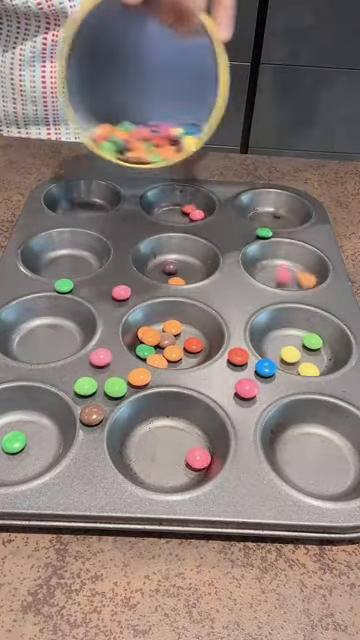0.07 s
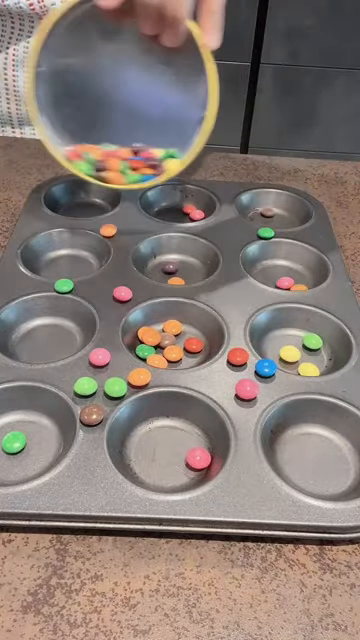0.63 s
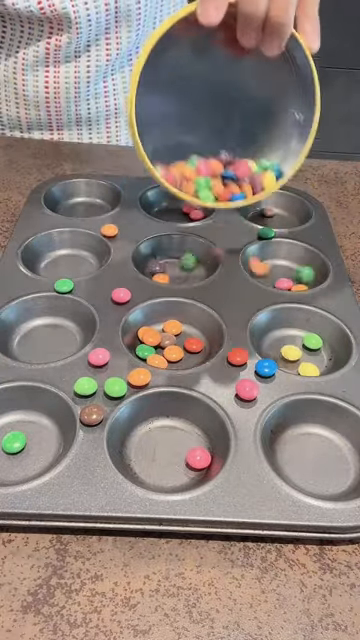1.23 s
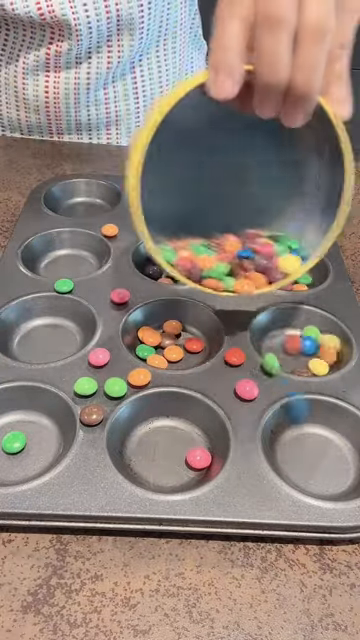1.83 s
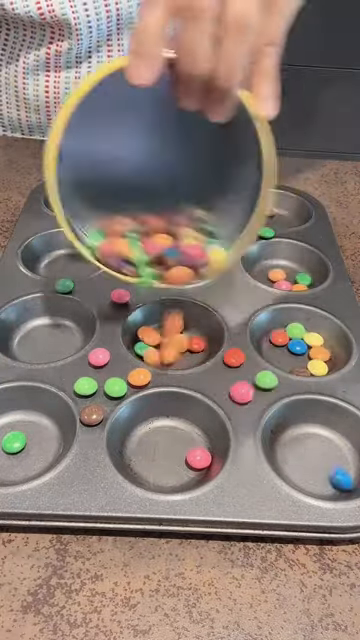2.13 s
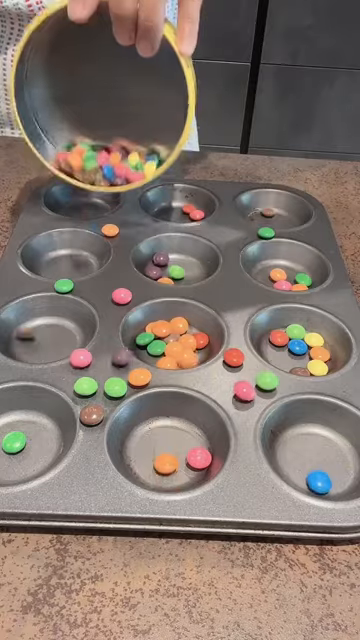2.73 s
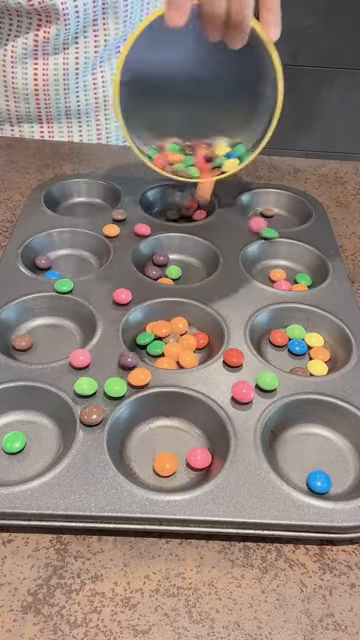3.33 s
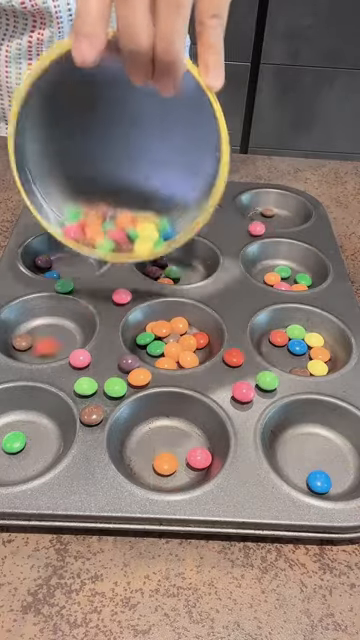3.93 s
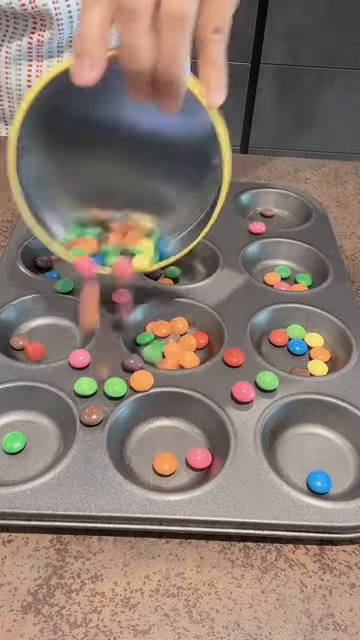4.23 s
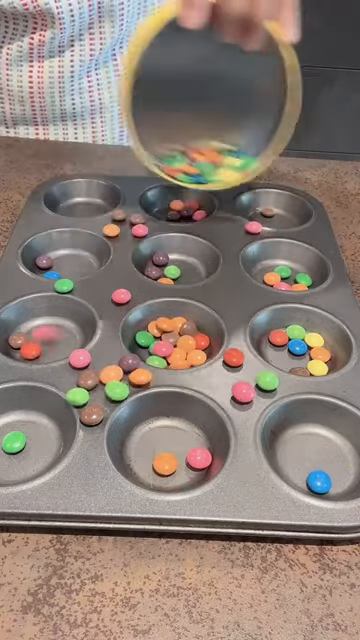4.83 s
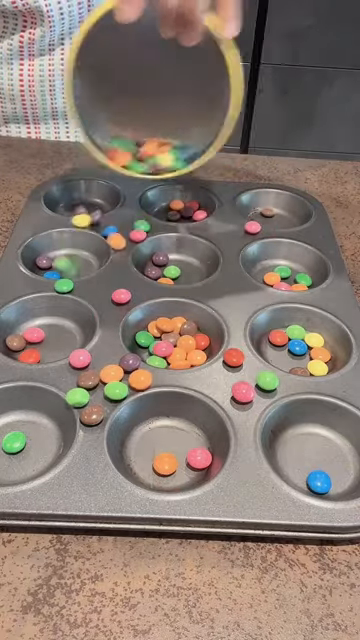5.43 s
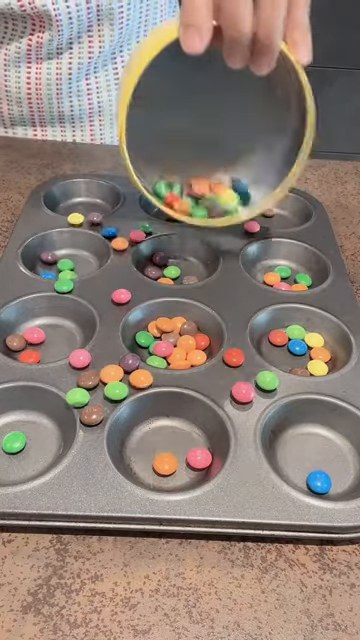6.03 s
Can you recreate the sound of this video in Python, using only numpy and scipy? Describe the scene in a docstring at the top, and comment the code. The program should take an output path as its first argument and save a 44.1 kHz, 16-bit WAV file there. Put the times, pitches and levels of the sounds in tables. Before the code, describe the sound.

Hard candies slide and rattle in a round tin as it is shaken again and again. A few at a time they drop onto a steel cupcake tray, each landing with a sharp crack, a bright metallic ring and often some quick, weaker bounces. The clatter thins late on, flares up once more and ends on a light hit. It is heard up close in a small, quiet kitchen with hard surfaces.

```python
"""Over the hush of a small, hard kitchen, a sugar-shelled candy cracks onto a steel cupcake tray,
rings a cup floor and hops on in shorter, weaker bounces. Shake after shake, the heap slides in a round
tin and more candies drop, ringing the deck, cup floors and cup walls and stirring those lying about.
From 0.7 s on, an odd one hits the tin's wall and leaves it humming, or makes one tray mode sing alone.
The clatter thins after 4.5 s, flares up just past 5 s and ends with a last light hit at 6 s."""
import sys
import numpy as np
from scipy import signal
from scipy.fft import rfft, irfft
from scipy.io import wavfile

SR = 44100
rng = np.random.default_rng(int(sys.argv[2]) if len(sys.argv) > 2 else 0)


def wav_out(sig):
    """Save sig, one row per channel (or a flat mono array), as 16-bit PCM at SR to the path in sys.argv[1]."""
    wavfile.write(sys.argv[1], SR, np.round(np.clip(np.atleast_2d(sig).T, -1, 1) * 32767).astype(np.int16))


N = 267687
CUTOFF_HZ = 15900


def from_db(db):
    """Decibels to gain."""
    return 10 ** (np.asarray(db) / 20)


def rms_one(x):
    """Scale to rms 1."""
    return x / np.sqrt(np.mean(x ** 2) + 1e-20)


def fade(t, t60):
    """Exponential decay, 60 dB down after t60."""
    return np.exp(-np.log(1000) * t / t60)


def at_hz(points, hz):
    """Read a curve on a log-frequency axis."""
    known_hz, values = np.transpose(points)
    return np.interp(np.log(np.maximum(hz, 1)), np.log(known_hz), values)


def add(out, s, sound):
    """Mix a sound in, starting at s seconds."""
    start = int(np.clip(round(s * SR), 0, N - 1))
    out[start:start + len(sound)] += sound[:N - start]


def coloured(x, curve, size=2048):
    """Minimum-phase EQ; white noise keeps its power."""
    gain = rms_one(from_db(at_hz(curve, np.linspace(0, SR / 2, size // 2 + 1))))
    cepstrum = irfft(np.log(gain))[:size // 2]
    cepstrum[1:] *= 2
    impulse = irfft(np.exp(rfft(cepstrum, size)))
    return signal.oaconvolve(x, impulse)[:N]


def ring(clicks, hz, t60):
    """A unit click sets a sine of height 1 ringing."""
    r, w = fade(1 / SR, t60), 2 * np.pi * hz / SR
    return signal.lfilter([0, np.sin(w)], [1, -2 * r * np.cos(w), r * r], clicks + 1e-18)


def resonance(x, hz, width_hz):
    """Band-pass with unity gain at its peak."""
    r, w = np.exp(-np.pi * width_hz / SR), 2 * np.pi * hz / SR
    return signal.lfilter(np.array([1, 0, -1]) * (1 - r * r) / 2, [1, -2 * r * np.cos(w), r * r], x)


def sines(hz, t):
    """A bank of sines, one row per pitch."""
    return np.sin((2 * np.pi * np.outer(hz, t)).astype(np.float32))


def clicks_at(times, heights):
    """One click at each time."""
    out = np.zeros(N)
    np.add.at(out, np.clip(np.round(times * SR).astype(int), 0, N - 1), heights)
    return out


def grains(per_s, spread_db):
    """Random tiny collisions at rms 1; with spread, a few stand out from many weak ones."""
    sizes = from_db(spread_db * np.minimum(rng.exponential(1, N), 4)) * rng.choice([-1, 1], N)
    return rms_one(sizes * (rng.random(N) < per_s / SR))


# EQ of the room tone: (frequency [Hz], level [dB])
ROOM_TONE_EQ = [(25, -11), (80, 0.5), (250, 5.5), (700, -6), (2000, -1), (6000, 10.5), (15000, -47)]

def room_tone(level_db):
    """The kitchen's hush, a steady noise bed under everything."""
    return from_db(level_db) * coloured(rng.standard_normal(N), ROOM_TONE_EQ)


# the mix at each landing place, with deck, floor and wall relative to the ring level:
# place: (deck [dB], deck tilt [dB/octave], cup floor [dB], cup wall [dB], bounce loss [dB], thump [dB])
PLACE_MIX = {"middle": (-6, -7.5, -9, -5, 9, -45), "deck": (-0.5, -1, -11.5, -26, 7.5, -44.5),
             "edge": (-1, 4, 1, -5, 5, -40), "cup lip": (0, -0.5, 0.5, -4, 6.5, -41),
             "cup floor": (-16.5, -3.5, 4, -34, 5, -45.5), "cup wall": (-11, 5, -27, -1, 15, -41.5),
             "tin wall": (-3.5, 10.5, -8, -10, 0, -48)}
# cue list of falling candies: (time [s], ring [dB], crack [dB], first hop [s] or 0 for none, place)
LANDINGS = [(0.002, -12.5, -16, 0.049, "cup floor"), (0.2542, -4.5, -10.5, 0.0099, "middle"),
            (0.3212, -11.5, -21.5, 0.01, "deck"), (0.6994, -28.5, -32, 0.00041, "tin wall"),
            (0.854, -17.5, -15, 0, "cup lip"), (0.877, -13.5, -12.5, 0.018, "cup lip"),
            (0.9427, -17, -15, 0.0046, "cup wall"), (0.9991, -4.5, -22, 0.003, "deck"),
            (1.0111, -6, -19, 0.042, "deck"), (1.1131, -16.5, -28, 0.014, "cup lip"),
            (1.193, -9.5, -16, 0.079, "cup floor"), (1.196, -12.5, -12.5, 0.0016, "cup lip"),
            (1.3084, -12, -19, .024, "cup floor"), (1.509, -13, -20, 0.048, "cup wall"),
            (1.6117, -4, -13, 0, "cup wall"), (1.631, -12, -7.5, 0.0035, "middle"),
            (1.6751, -8.5, -19, 0.056, "cup floor"), (1.705, -16.5, -13, 0.0043, "deck"),
            (1.8878, -26, -21.5, 0.0044, "cup floor"), (1.9283, -45, -21, 0.0048, "edge"),
            (2.0, -17, -16.5, 0.00052, "edge"), (2.0185, -12.5, -27, 0.0074, "cup floor"),
            (2.0676, -11.5, -20, 0.00044, "cup floor"), (2.108, -5, -17, 0.00079, "cup wall"),
            (2.1222, -8, -21, 0, "cup wall"), (2.1576, -17, -16, .02, "edge"),
            (2.2357, -11, -15, 0.0017, "cup floor"), (2.25, -9.5, -15.5, 0.0024, "cup wall"),
            (2.295, -15, -15, 0.0011, "cup lip"), (2.3223, -21, -15.5, 0.0024, "edge"),
            (2.3442, -9, -9.5, 0.0032, "cup wall"), (2.3601, -11, -17.5, 0.0022, "deck"),
            (2.4202, -35, -17, 0.0052, "edge"), (2.4559, -12, -17, .057, "cup floor"),
            (2.666, -7, -22, 0.0036, "cup floor"), (2.7431, -14.5, -22, 0.032, "cup floor"),
            (2.8388, -7, -10, 0.00023, "cup lip"), (2.8464, -18, -9, 0.022, "deck"),
            (2.9025, -15, -21, 0.0026, "deck"), (2.9077, -7.5, -15, 0.0018, "deck"),
            (3.004, -6, -11.5, 0.01, "deck"), (3.0346, -17, -12.5, 0.0018, "cup wall"),
            (3.1062, -13, -20, 0.0031, "deck"), (3.131, -15, -18, 0.00096, "cup floor"),
            (3.1772, -8, -10.5, .042, "deck"), (3.323, -15, -13, 0, "cup lip"),
            (3.4132, -19.5, -12.5, 0.00093, "deck"), (3.4996, -6, -8.5, 0.0021, "deck"),
            (3.5599, -12.5, -13.5, 0, "deck"), (3.6092, -4.5, -13.5, 0.047, "cup wall"),
            (3.857, -42, -19, 0.0045, "cup floor"), (3.945, -21, -29, 0, "tin wall"),
            (4.0683, -8, -11.5, 0.00062, "cup wall"), (4.0889, -5.5, -14, 0.002, "cup wall"),
            (4.1514, -10, -16.5, 0.045, "deck"), (4.2365, -29, -21, 0, "edge"),
            (4.242, -14.5, -7, 0, "deck"), (4.2797, -8, -8, .03, "cup lip"),
            (4.3522, -14, -27, 0.06, "edge"), (4.466, -42, -22.5, 0.0097, "deck"),
            (4.8212, -20, -36, 0.0072, "cup floor"), (4.9728, -39, -28, 0, "tin wall"),
            (4.996, -22.5, -27, 0.00056, "tin wall"), (5.094, -3, -9.5, 0.0013, "middle"),
            (5.114, -6, -10.5, 0.043, "middle"), (5.2755, -8, -10.5, 0.00079, "deck"),
            (5.3011, -5, -14, 0.025, "deck"), (5.368, -14.5, -29, 0.00051, "deck"),
            (5.414, -11.5, -9, 0, "cup floor"), (5.4582, -13.5, -20, 0.00056, "cup floor"),
            (5.5287, -14.5, -24, 0, "cup floor"), (5.6386, -24, -17, 0.024, "tin wall"),
            (6.053, -22, -19.5, 0, "cup wall")]

def contacts(bounces=3, restitution=0.8, crack_loss_db=8.5, thump_follows=0.69):
    """Times, levels and deck tilt of every hit: a candy lands and may hop on, shorter and softer."""
    hits = []
    for s, ring_db, crack_db, hop_s, place in LANDINGS:
        deck_db, tilt_db, floor_db, wall_db, loss_db, thump_db = PLACE_MIX[place]
        for k in range(bounces + 1 if hop_s > 0 else 1):
            db = ring_db - k * loss_db
            hits.append((s, crack_db - k * crack_loss_db, db + deck_db, tilt_db,
                         db + floor_db, db + wall_db, thump_db + thump_follows * db))
            s += hop_s * restitution ** k
    return np.transpose(hits)


# EQ of a sugar shell cracking on steel: (frequency [Hz], level [dB])
CRACK_EQ = [(150, -4.5), (400, -7), (900, 9), (1500, 3.5), (2400, 5), (4000, -10.5), (5600, 13.5),
            (7000, 9), (9300, 13), (10800, 7), (11900, -2.5), (13800, 10.5), (15800, 6.5)]

def cracks(times, level_db, snap_t60, fizz_t60, fizz_db, mode_count=40):
    """The attack: a hard shell snaps on the steel and leaves a glassy fizz of modes, new each time."""
    out, t = np.zeros(N), np.arange(SR // 8) / SR
    for s, db in zip(times, level_db):
        hz = rng.uniform(1000, CUTOFF_HZ, mode_count)
        modes = rms_one(rng.standard_normal(mode_count) @ sines(hz, t))
        fizz = from_db(fizz_db) * modes * fade(t, fizz_t60)
        snap = rng.standard_normal(len(t)) * fade(t, snap_t60)
        add(out, s, from_db(db) * (snap + fizz))
    return coloured(out, CRACK_EQ)


def clinks(times, level_db, clink_db, t60, low_hz=7550, high_hz=15050, partials=3):
    """The sparkle: each struck candy rings for a moment at a few high pitches of its own."""
    out, t = np.zeros(N), np.arange(SR // 20) / SR
    pitches = rng.uniform(low_hz, high_hz, (len(times), partials))
    for s, db, hz in zip(times, level_db, pitches):
        add(out, s, from_db(db + clink_db) * sines(hz, t).sum(axis=0) * fade(t, t60))
    return out


def steel(times, level_db, modes, tilt_db, rise_s, spot_t60, tail_db, detune, place_spread_db=4):
    """The struck spot rings loudly and briefly, then its energy lingers as a tail in the whole sheet."""
    hz, mode_db, tail_t60 = np.transpose(modes)
    chance = rng.standard_normal((len(times), 4, len(hz)))
    place, mistuning, spot_sign, tail_sign = chance.swapaxes(0, 1)
    # every landing place favours other modes, and a harder contact the higher ones
    octaves = np.log2(hz / hz.mean())
    mix = from_db(mode_db + np.outer(tilt_db, octaves) + place_spread_db * place)
    heights = from_db(level_db)[:, None] * mix / np.linalg.norm(mix, axis=1, keepdims=True)
    tuned_hz = hz * (1 + detune * mistuning)  # no two cups are quite alike
    out, t = np.zeros(N), np.arange(SR // 10) / SR
    envelope = (1 - np.exp(-t / rise_s)) * fade(t, spot_t60)  # bending waves take time to fill the spot
    for s, height, pitches in zip(times, heights * np.sign(spot_sign), tuned_hz):
        add(out, s, height @ sines(pitches, t) * envelope)
    tails = heights * np.sign(tail_sign) * from_db(tail_db)
    for mode_hz, t60, height in zip(hz, tail_t60, tails.T):
        out += ring(clicks_at(times, height), mode_hz, t60)
    return out


# modes of the tray's flat deck: (frequency [Hz], level [dB], tail t60 [s])
DECK_MODES = [(1696, -14, 0.36), (1836, -8, 0.36), (1892, -14, 0.3), (3424, -5, 0.3), (3505, -3, 0.45),
              (3569, -6, 0.3), (3661, -5, 0.45), (4323, -10, 0.7), (4352, -10, 0.42), (4433, -9, 0.5),
              (4503, -1, 0.65), (5461, -11, 0.39), (5623, -8, 0.38), (6161, -8, 0.37), (6210, -2, 0.45),
              (6298, -4, 0.36), (6355, 0, 0.45), (6447, -7, 0.36), (6516, -6, 0.36), (7803, -10, 0.33),
              (7967, -10, 0.33), (9087, -13, 0.31), (9391, -8, 0.31), (9491, -10, 0.31), (9711, -13, 0.31),
              (10107, -13, 0.3), (10950, -14, 0.25), (11840, -18, 0.25), (13200, -15, 0.2),
              (13811, -16, 0.27), (14080, -15, 0.2), (14560, -16, 0.2), (15130, -17, 0.26)]
# cup floor modes, clustered as the cups are nearly alike: (frequency [Hz], level [dB], tail t60 [s])
CUP_FLOOR_MODES = [(2745, -11, .9), (2810, -9, 1.0), (5130, -9, .45), (5260, -3, .5), (5328, 2, .5),
                   (5390, -5, .45), (8605, -6, .35), (8693, 0, .4), (8735, -4, .35), (10160, -11, .35),
                   (10260, -12, .35), (12900, -9, .3), (13000, -12, .3), (14350, -12, .25)]
# cup wall modes: (frequency [Hz], level [dB], tail t60 [s])
CUP_WALL_MODES = [(6212, -6, 0.25), (6374, -9, 0.25), (7114, -12, 0.25), (7364, -1, 0.25), (7510, -9, 0.25),
                  (7642, 0, 0.25), (7741, -3, 0.25), (7819, -2, 0.25), (7981, -7, 0.25), (9752, -12, 0.25),
                  (9833, -11, 0.25), (10619, -9, 0.25)]

def tray_ring(times, deck_db, deck_tilt_db, floor_db, wall_db):
    """The metal: every hit rings the deck, cup floors and cup walls in its own balance."""
    deck = steel(times, deck_db, DECK_MODES, deck_tilt_db,
                 rise_s=0.00029, spot_t60=0.11, tail_db=-15, detune=0.0088)
    floors = steel(times, floor_db, CUP_FLOOR_MODES, tilt_db=1,
                   rise_s=0.00097, spot_t60=0.05, tail_db=-17.5, detune=0.0065)
    walls = steel(times, wall_db, CUP_WALL_MODES, tilt_db=0,
                  rise_s=0.0016, spot_t60=0.066, tail_db=-22, detune=0.003)
    return deck + floors + walls


# the whole tray flexing on the counter: (frequency [Hz], level [dB], t60 [s])
FLEX_MODES = [(55, -12, .15), (84, 1.5, 0.15), (97, 8, 0.038), (169.5, -4.5, 0.27), (258, 0.5, 0.27),
              (390, -8, 0.094)]

def tray_thump(times, level_db, push_hz):
    """The low end: every hit gives the whole tray a soft push, and it thumps on the counter."""
    soften = signal.butter(1, push_hz, fs=SR, output="sos")
    pushes = signal.sosfilt(soften, clicks_at(times, from_db(level_db)))
    return sum(ring(pushes, hz, t60) * from_db(db) * (-1) ** k
               for k, (hz, db, t60) in enumerate(FLEX_MODES))


# reverb time of the kitchen: (frequency [Hz], t60 [s])
KITCHEN_DECAY = [(100, 0.66), (1000, 0.95), (4000, 1), (8000, 0.78), (15000, 0.42)]

def kitchen_reverb(x, bands=8, build_up_s=0.0052):
    """Diffuse reflections off tiles and counter, dying away band by band."""
    t, response = np.arange(SR * 3 // 4) / SR, 0
    edges = np.geomspace(60, 18000, bands + 1)
    for low, high in zip(edges, edges[1:]):
        band_pass = signal.butter(2, [low, high], "band", fs=SR, output="sos")
        band = signal.sosfilt(band_pass, rng.standard_normal(len(t)))
        response += band * fade(t, at_hz(KITCHEN_DECAY, np.sqrt(low * high)))
    response *= np.minimum(t / build_up_s, 1)
    return signal.oaconvolve(x, response / np.linalg.norm(response))[:N]


# how restless the candies are: (time [s], level [dB])
UNREST_CURVE = [(0.0, -23), (0.25, -30), (0.52, -40), (0.73, -31), (1.06, -21), (1.39, -28), (2.03, -25.5),
                (2.23, -23.5), (2.55, -31.5), (3.08, -22.5), (3.97, -35), (4.28, -21.5), (4.58, -37),
                (4.97, -33), (5.26, -19.5), (5.41, -22), (5.83, -30.5), (6.07, -33.5)]

def unrest():
    """The candies' restlessness, a fader ride shared by their ticking and rolling."""
    s, db = np.transpose(UNREST_CURVE)
    return from_db(np.interp(np.arange(N) / SR, s, db))


# EQ of shells ticking together: (frequency [Hz], level [dB])
TICK_EQ = [(200, -22.5), (700, -1.5), (1500, 1.5), (2400, 5), (3400, 9), (6000, 6), (8200, 9.5), (10300, 9),
           (11700, -2.5), (13200, 7), (15800, -8)]

def rustle(tick_t60, ping_cycles, ping_db, unrest_db=-6.5, stir_db=-20.5, stir_t60=0.57, candies=24):
    """Shells tick together as the heap shifts or a landing stirs them; each pings at its own pitch."""
    activity = (from_db(unrest_db) * unrest()) ** 2
    settling = fade(np.arange(SR // 2) / SR, stir_t60)
    for s, ring_db, *_ in LANDINGS:
        add(activity, s, (from_db(ring_db + stir_db) * settling) ** 2)
    t = np.arange(SR // 50) / SR
    touches = grains(per_s=650, spread_db=2.5)
    tick_power = signal.oaconvolve(touches ** 2, fade(t, tick_t60) ** 2)[:N]
    ticks = rms_one(np.sqrt(np.abs(tick_power)) * rng.standard_normal(N))
    touched = rng.integers(0, candies, N)
    pings = sum(ring(touches * (touched == k), hz, ping_cycles / hz)
                for k, hz in enumerate(np.geomspace(4500, 15000, candies)))
    texture = ticks + from_db(ping_db) * rms_one(pings)
    return coloured(texture * np.sqrt(activity), TICK_EQ)


# cue list of the tin's shakes: (time [s], level [dB])
SHAKES = [(0.164, -33), (0.321, -35.5), (0.5, -41), (0.62, -43), (0.762, -31), (0.851, -35.5),
          (0.975, -33.5), (1.099, -49), (1.19, -38), (1.374, -37.5), (1.56, -32.5), (1.691, -44),
          (1.944, -35), (2.089, -35), (2.232, -34), (2.385, -36), (2.526, -38), (2.672, -41.5),
          (2.797, -33), (2.999, -31.5), (3.13, -51), (3.295, -35.5), (3.46, -28), (3.6, -42.5),
          (4.015, -36), (4.235, -36), (4.36, -40), (4.523, -38.5), (4.67, -40.5), (5.072, -29),
          (5.227, -38.5), (5.33, -38), (5.544, -39.5), (5.728, -34.5), (5.962, -35.5)]
# resonances of the tin's bottom and the air in it: (frequency [Hz], width [Hz], level [dB])
TIN_BODY = [(383, 56, -13.5), (609, 29, -1.5), (634, 4.7, 3.5), (680, 62, 2), (798, 190, -2.5),
            (1020, 196, 1.5), (1262, 58, 8), (1333, 108, 0.5), (1998, 65, 2), (2890, 68, 3),
            (3310, 180, -4), (4680, 97, -2.5)]

def sliding_heap(rise_s, slide_s, settle_t60, roll_db):
    """Candies roll, and at each shake tumble, over the tin's bottom, which gives a hollow clatter."""
    motion, t = from_db(roll_db) * unrest(), np.arange(SR // 2) / SR
    slide = np.minimum(t / rise_s, 1) * fade(np.maximum(t - slide_s, 0), settle_t60)
    for s, db in SHAKES:
        add(motion, s, from_db(db) * slide)
    knocks = motion * grains(per_s=450, spread_db=2.5)
    body = sum(resonance(knocks, hz, width) * from_db(db) * (-1) ** k
               for k, (hz, width, db) in enumerate(TIN_BODY))
    shells = motion * coloured(grains(per_s=2500, spread_db=0), TICK_EQ)
    return from_db(14.5) * body + from_db(2) * shells


# modes of the tin's wall: (frequency [Hz], level relative to the hit's ring [dB], t60 [s])
TIN_WALL_MODES = [(637, -21.5, 0.78), (2880, -19.5, 0.31), (4860, -15, 0.65)]

def tin_hum():
    """A candy thrown against the tin's wall leaves a thin hum."""
    hits = [(s, ring_db) for s, ring_db, _, _, place in LANDINGS if place == "tin wall"]
    times, ring_db = np.transpose(hits)
    return sum(ring(clicks_at(times, from_db(ring_db + db)), hz, t60) for hz, db, t60 in TIN_WALL_MODES)


# cue list of pure ringing accents: (time [s], frequency [Hz], level [dB], t60 [s])
TRAY_PINGS = [(0.887, 2760, -14, 0.13), (1.309, 5310, -20, 0.19), (2.456, 8660, -15, 0.039),
              (2.461, 5310, -11, 0.033), (3.006, 4480, -16.5, 0.49), (3.132, 9050, -3.5, 0.016),
              (3.219, 4494, -23, 0.18), (3.412, 8963, -8, 0.017), (3.857, 5300, -10.5, 0.022),
              (3.857, 8650, -7.5, 0.032), (4.0675, 7560, -2.5, 0.019), (4.833, 2360, -31, 0.067),
              (5.458, 8564, -10, 0.031)]

def tray_pings():
    """A candy lands right on the belly of one mode, which sings out alone above the clatter."""
    out, t = np.zeros(N), np.arange(SR // 2) / SR
    for s, hz, db, t60 in TRAY_PINGS:
        add(out, s, from_db(db) * np.sin(2 * np.pi * hz * t) * fade(t, t60))
    return out


def scene():
    """The mono mix: tray and tin up close, the room behind them."""
    times, crack_db, deck_db, deck_tilt_db, floor_db, wall_db, thump_db = contacts()
    close = tray_ring(times, deck_db, deck_tilt_db, floor_db, wall_db)
    close += cracks(times, crack_db, snap_t60=0.022, fizz_t60=0.19, fizz_db=-10.5)
    close += clinks(times, crack_db, clink_db=-7, t60=0.028)
    close += tray_thump(times, thump_db, push_hz=503)
    close += sliding_heap(rise_s=0.0063, slide_s=0.039, settle_t60=0.087, roll_db=-17.5)
    close += rustle(tick_t60=0.025, ping_cycles=190, ping_db=-7)
    close += tin_hum() + tray_pings()
    room = room_tone(level_db=-47) + from_db(-7.5) * kitchen_reverb(close)
    return (close + room)[None]


def record(dry):
    """The master chain: soft-clip the peaks, roll off the sub bass, cut the very top."""
    ceiling = 0.68
    rounded = ceiling * np.tanh(dry / ceiling)
    low_cut = signal.butter(2, 45, "high", fs=SR, output="sos")
    high_cut = signal.ellip(10, 0.3, 80, CUTOFF_HZ, fs=SR, output="sos")
    return signal.sosfilt(high_cut, signal.sosfilt(low_cut, rounded))


dry = scene()
out = record(dry)
wav_out(out)
```